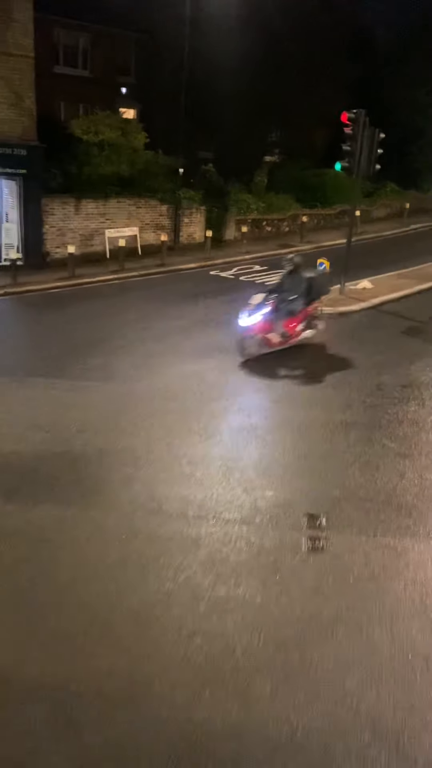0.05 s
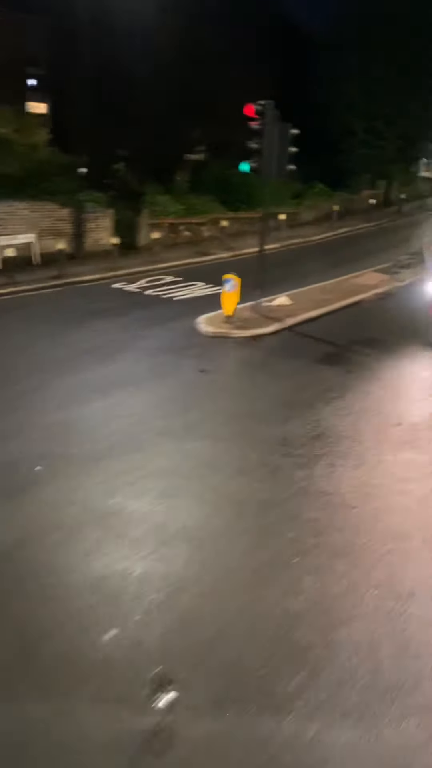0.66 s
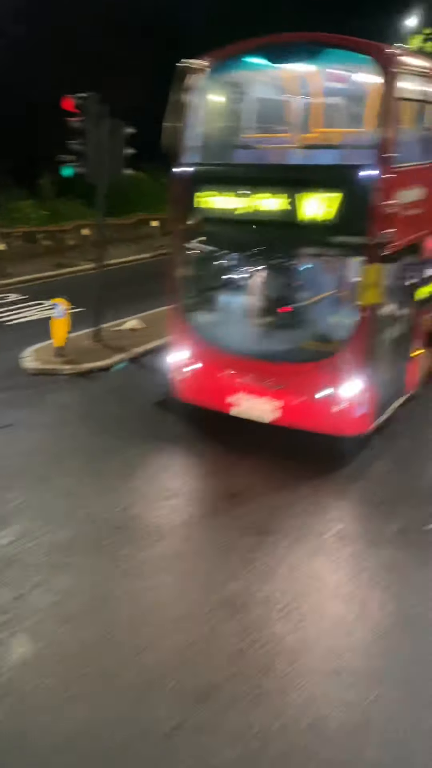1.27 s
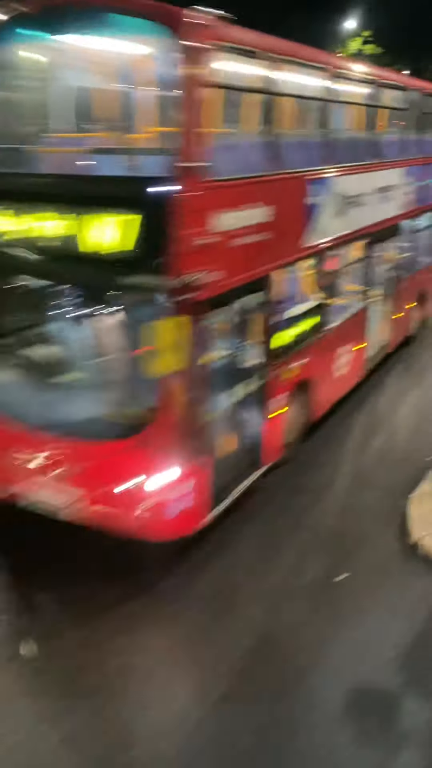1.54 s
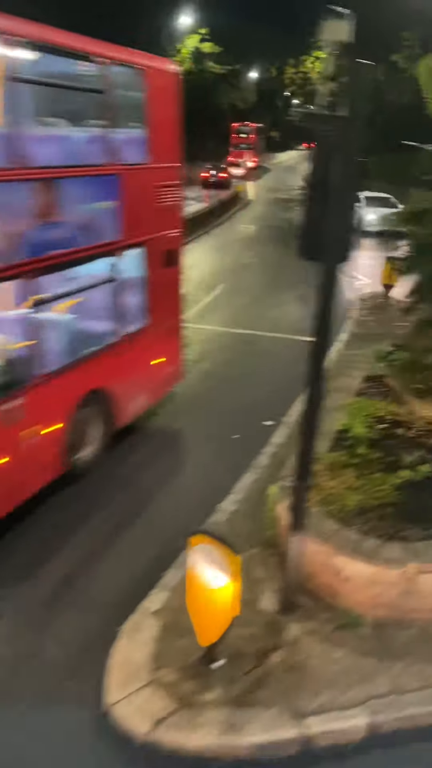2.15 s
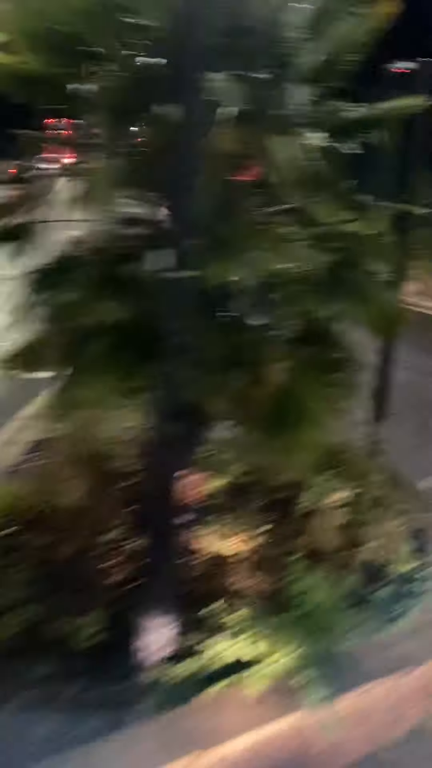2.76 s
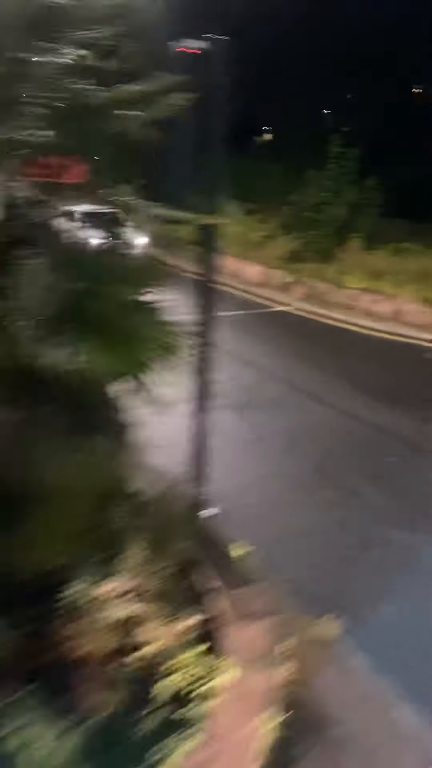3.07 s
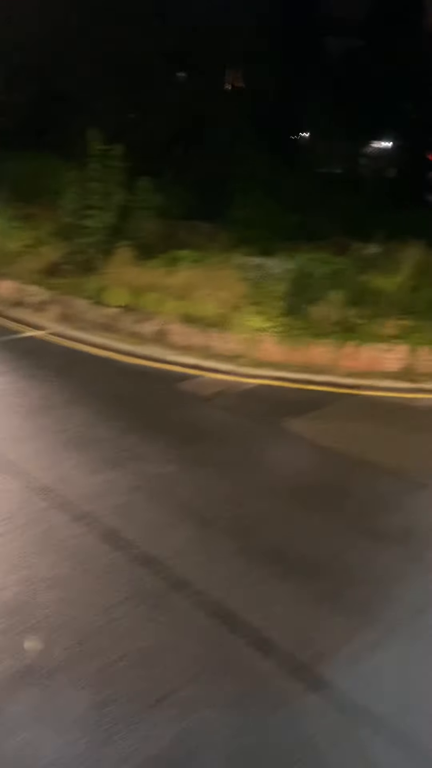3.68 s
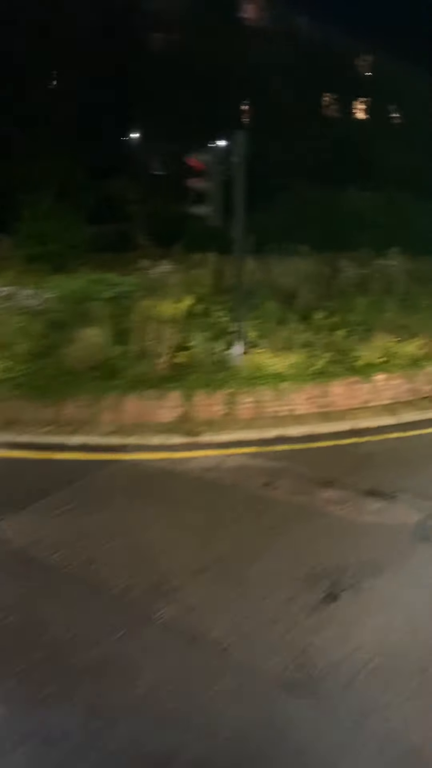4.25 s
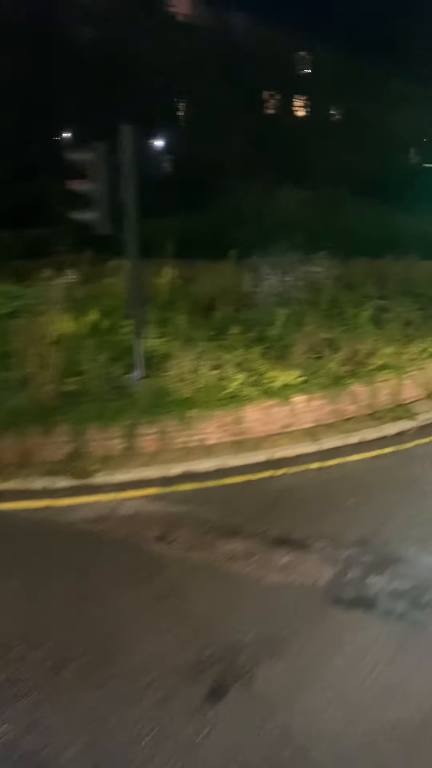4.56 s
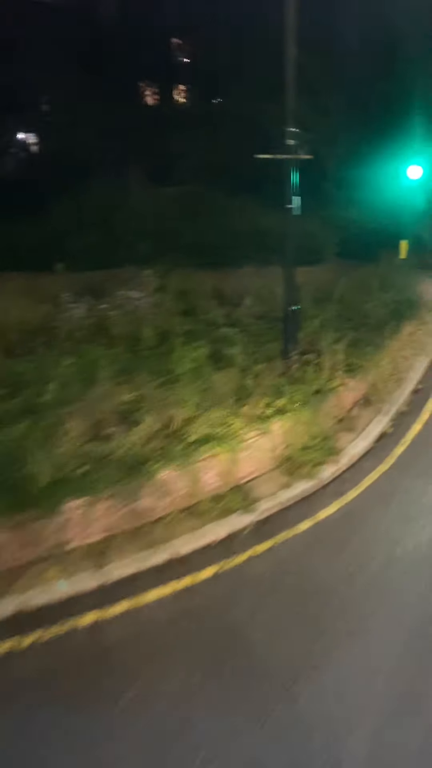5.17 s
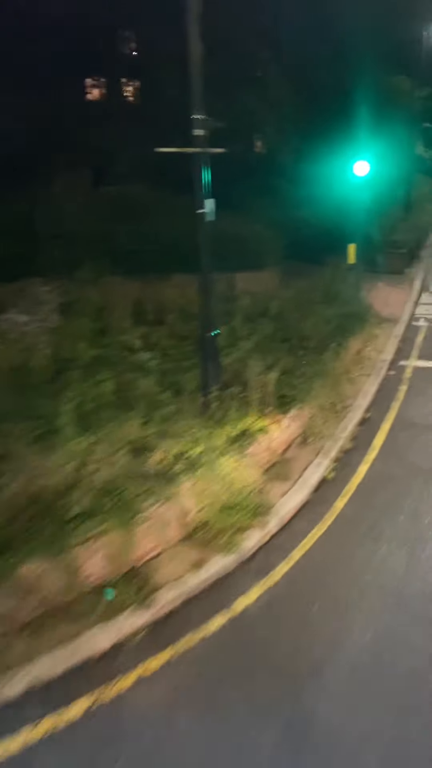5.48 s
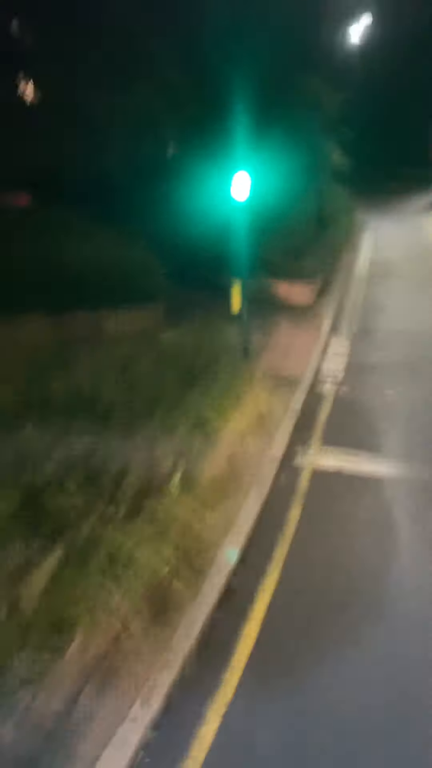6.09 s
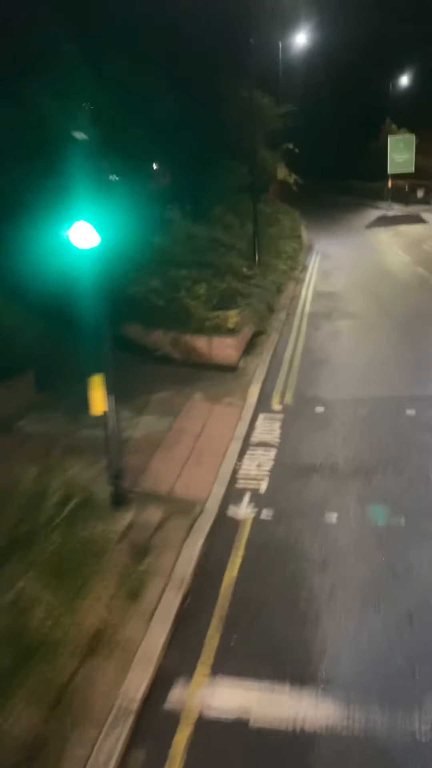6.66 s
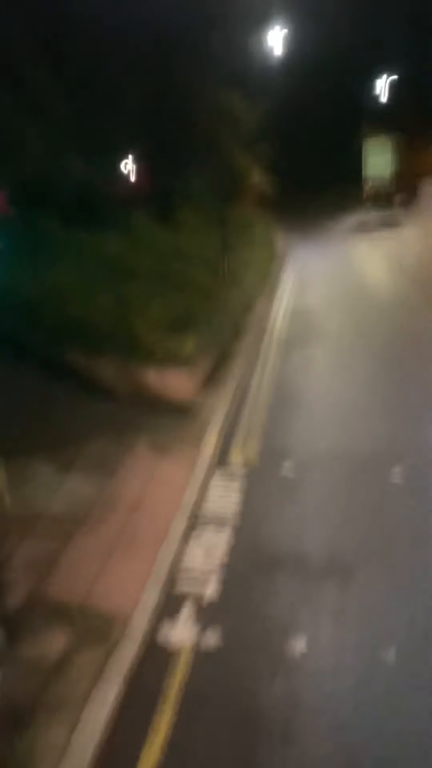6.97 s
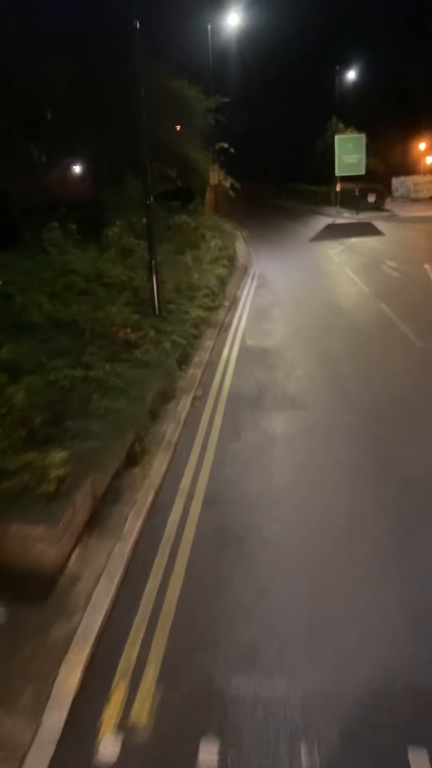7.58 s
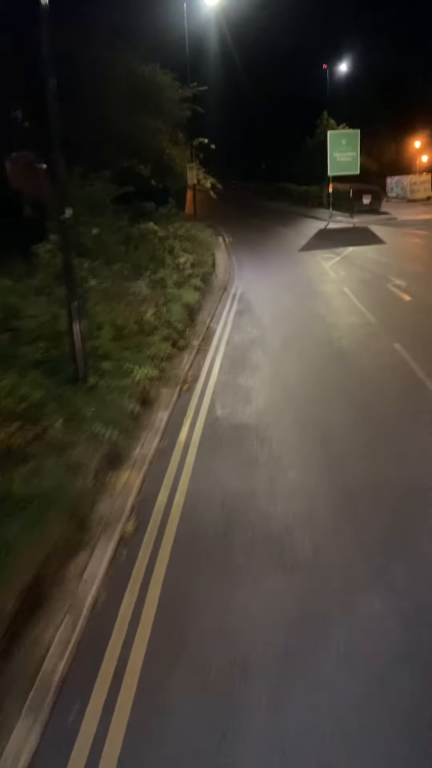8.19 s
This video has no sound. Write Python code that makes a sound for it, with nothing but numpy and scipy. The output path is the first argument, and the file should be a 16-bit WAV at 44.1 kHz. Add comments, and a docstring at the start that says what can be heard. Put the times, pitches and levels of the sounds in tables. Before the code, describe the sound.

Inside a bus, a low diesel engine idles briefly and accelerates, a car swishes past, and loose panels knock and clatter.

```python
"""Night bus, upper deck

Stereo microphone at the front seat of a double-decker. The brakes sing faintly, air valves spit, then
the six-cylinder diesel pulls away over a fading low hum, changes up and pulls again, its orders sweeping
through a boom of the cabin. Outside the glass an oncoming car hisses by on the wet road. Bumps make the
body thump, and its loose panels clack and chatter around the seat."""
import sys
import numpy as np
from scipy import signal
from scipy.fft import rfft, irfft, next_fast_len
from scipy.io import wavfile

SR = 44100
rng = np.random.default_rng(int(sys.argv[2]) if len(sys.argv) > 2 else 0)


def generate_wav(signal):
    """Clip the signal to [-1, 1] and save it as 16-bit WAV at the path in sys.argv[1]."""
    frames = np.transpose(np.atleast_2d(signal))
    scaled = np.clip(frames, -1, 1) * 32767
    pcm = np.round(scaled).astype(np.int16)
    wavfile.write(sys.argv[1], SR, pcm)


N = 367339
TIME = np.arange(N) / SR


# Engine speed, falling at the gear change: t/s, firing rate/Hz
FIRING_RATE = [(0, 40.7), (.45, 33.2), (.75, 32.3), (.97, 32), (1.3, 55.3), (1.55, 63.6), (1.8, 66.3),
               (2.5, 68.3), (3.3, 72.1), (4.8, 80.6), (5.05, 79.2), (5.3, 75.3), (5.8, 63), (6.05, 63.9),
               (6.3, 67.1), (8.33, 81.8)]
# Firing tone from the upper deck: t/s, relative level/dB
FIRING_LEVEL = [(0, -18), (.2, -15.5), (.9, -16), (1.05, -10.5), (1.3, -14), (1.5, -17.5), (2.1, -17.5),
                (2.6, -11.5), (3.2, -11), (5.0, -14), (5.2, -11), (5.55, -11.5), (5.9, -14), (6.6, -14),
                (6.85, -9.5), (7.05, -14), (8.33, -13)]
# Brief dips of that tone: t/s, half length/s, gain/dB
FIRING_DIPS = [(1.13, .04, -22), (1.39, .035, -8), (1.78, .06, -6), (5.71, .05, -9.5), (6.2, .09, -12),
               (7.17, .07, -4)]
# Exhaust and block tones: cycles per crank turn, relative level coasting/dB, pulling/dB
ENGINE_ORDERS = [(1.5, -37, -21.5), (2, -38, -22), (2.5, -35, -15.5), (3, 0, 0), (3.5, -31, -19),
                 (4, -30, -11.5), (4.5, -29, -17.5), (5, -30, -22), (5.5, -30, -20), (6, -15, -16),
                 (6.5, -30, -30), (7, -25, -32), (7.5, -22, -30), (8, -23, -20.5), (8.5, -28, -32),
                 (9, -18, -29), (10, -31, -30), (10.5, -27, -30), (11, -30, -31), (12, -16, -25),
                 (14, -35, -35), (15, -26, -40), (18, -26, -43)]
# Standing waves of the cabin, lifting or hollowing each order under load: f/Hz, gain/dB
CABIN_RESPONSE = [(85, 0), (96, 3), (108, -1), (119, 4), (133, -7), (146, -3), (158, 4), (175, -4),
                  (195, -3), (212, 2), (240, 0)]

def engine(unevenness=.12, other_orders_db=-14, gain_db=3):
    """The diesel fires three times a crank turn; under load unequal cylinders add the orders between."""
    dips_db = sum(db * np.exp(-((TIME - s) / half_s) ** 2) for s, half_s, db in FIRING_DIPS)
    firing_db = in_time(FIRING_LEVEL) + dips_db
    load = throttle()
    turns_hz = in_time(FIRING_RATE) / 3
    crank = phase_of(turns_hz)
    tones = 0
    for order, coasting_db, pulling_db in ENGINE_ORDERS:
        waver = 1 + unevenness * (order != 3) * drift(4)
        cabin_db = np.interp(order * turns_hz, *np.transpose(CABIN_RESPONSE))
        order_db = coasting_db + load * (pulling_db + cabin_db - coasting_db)
        base_db = firing_db if order == 3 else other_orders_db
        tones += from_db(base_db + order_db) * waver * np.cos(order * crank + rng.uniform(0, 2 * np.pi))
    return cabin_boom(crank) + tones * from_db(gain_db + .02 * drift(7.8))


# Engine orders that shake the cabin: cycles per crank turn, relative level/dB
SHAKING_ORDERS = [(10, -6), (11, -12.5), (12, 0), (13, -5)]
# How hard they shake it: t/s, level/dB
SHAKE_LEVEL = [(0, -39), (1.15, -11), (1.4, -10), (1.6, -22.5), (1.85, -19), (2.4, -14), (3.0, -18),
               (3.3, -27.5), (3.7, -15), (4.35, -16.5), (4.85, -9.5), (5.2, -17.5), (5.55, -17),
               (6.3, -28.5), (6.65, -20), (7.05, -26.5), (7.7, -26.5), (8.2, -8.5)]

def cabin_boom(crank, hz=271.1, width_hz=16.9):
    """A narrow resonance of the cabin swells as an engine order crosses it."""
    shake = sum(from_db(db) * np.cos(order * crank) for order, db in SHAKING_ORDERS)
    shake *= from_db(in_time(SHAKE_LEVEL) + 1.2 * drift(28))
    return np.sqrt(2) * resonate_twice(shake, hz, width_hz)


PULL_AWAY_S = .91

def throttle(rise_s=.3):
    """The throttle goes from shut (0) to open (1) and stays open."""
    return np.clip((TIME - PULL_AWAY_S) / rise_s, 0, 1)


# Steady rumble of the body under the seat: t/s, level/dB
BODY_LEVEL = [(0, -24), (.8, -25.5), (1.5, -23), (2.05, -23.5), (2.3, -38.5), (3.3, -28.5), (4.4, -25.5),
              (5.3, -23.5), (6.4, -20.5), (8.33, -21.5)]
# Body rumble, tyre roar and wet spray, from inside: f/Hz, relative density/dB
RUMBLE_SPECTRUM = [(15, -37.5), (30, -6), (50, 12), (85, 6.5), (130, 3.5), (190, 0), (260, -0.5),
                   (330, -5.5), (450, -18), (650, -23.5), (1200, -48.5), (4000, -100)]
ROAR_SPECTRUM = [(200, -4), (400, -1.5), (600, -11), (800, -12), (1020, -12.5), (1400, -13.5), (1850, -14),
                 (2250, -21.5), (2750, -20.5), (3250, -27), (3800, -25), (4600, -32), (5400, -57),
                 (9500, -56), (12500, -76.5)]
SPRAY_SPECTRUM = [(2500, 0), (4500, 4), (5400, 4), (7200, 4), (9500, -1), (10700, -17), (12500, -36.5),
                  (16000, -53.5)]
# Hollow notes of the body over a bump: f/Hz, width/Hz, level against the bump's rumble/dB
BODY_MODES = [(186, 50, -5.5), (385, 43, -16), (540, 55, -25)]

def road(roar_db=-39, spray_db=-61.5, bump_spray_db=-19, crawl_db=-1, crawl_low_hz=82):
    """The body rumbles on its springs, deeper once under way; the tyres below roar and throw spray."""
    bump_rumble, bump_roar, _ = bumps()
    rolling_db = crawl_db * (1 - throttle())
    rumble_gain = np.hypot(from_db(in_time(BODY_LEVEL)), bump_rumble)
    roar_gain = np.hypot(from_db(roar_db + rolling_db), bump_roar)
    spray_gain = np.hypot(from_db(spray_db + rolling_db), from_db(bump_spray_db) * bump_roar)
    deep = noise(RUMBLE_SPECTRUM, flutter_db=1.37, rate=22.4)
    shallow = signal.sosfilt(signal.butter(3, crawl_low_hz, "high", fs=SR, output="sos"), deep)
    rumble = shallow + throttle() * (deep - shallow)
    hollow = sum(from_db(db) * rms_one(resonate_twice(rng.standard_normal(N), hz, width_hz))
                 for hz, width_hz, db in BODY_MODES)
    roar = through_panels(noise(ROAR_SPECTRUM, flutter_db=1.32, rate=24), modes_db=-4.5)
    spray = noise(SPRAY_SPECTRUM, flutter_db=2, rate=28)
    return rumble_gain * rumble + bump_rumble * hollow + roar_gain * roar + spray_gain * spray


# Bumps in the road: t/s, length/s, body rumble/dB, tyre roar/dB, chatter/dB
ROAD_BUMPS = [(0.949, 0.14, -23, -43, -44), (2.075, 0.065, -28, -34, -33.5), (2.47, 0.043, -43.5, -48, -36),
              (3.879, 0.13, -20.5, -37, -29.5), (5.926, 0.358, -16, -29.5, -35),
              (6.852, 0.35, -20.5, -28, -32.5), (7.191, 0.18, -25.5, -37.5, -44)]

def bumps(attack_s=.033, release_s=.029):
    """Each bump shakes the bus for its length: gains of rumble, roar and chatter."""
    gains = 0
    for s, length_s, *levels_db in ROAD_BUMPS:
        attack = np.clip((TIME - s) / attack_s, 0, 1)
        release = np.exp(-np.clip((TIME - s - length_s) / release_s, 0, 20))
        gains += np.outer(from_db(levels_db), attack * release)
    return gains


# Loose panels knocking in the cabin: t/s, relative level/dB, snap against the knock/dB
PANEL_KNOCKS = [(2.094, -29, -15), (3.927, -22.5, -25), (3.962, -21.5, -27), (3.97, -6, -7),
                (3.986, -20.5, -22), (4.115, -16, -6), (4.184, -19, -7), (4.247, -18.5, -8),
                (4.377, -25, -22), (4.61, -28, -31), (4.733, -20.5, -13), (4.954, -27.5, -24),
                (4.995, -28.5, -27), (5.038, -26.5, -26), (5.116, -29, -24), (5.397, -36.5, -15),
                (5.637, -24.5, -26), (5.687, -14.5, -30), (5.779, -16, -25), (5.794, -16, -13),
                (5.921, -15.5, -9), (5.935, -11.5, -29), (6.018, -11, -25), (6.143, -4, -13),
                (6.212, -21, -25), (6.238, -4, -22), (6.355, -11, -14), (6.389, -22.5, -9),
                (6.475, -13.5, -11), (6.56, -10, -12), (6.563, -13, -11), (6.653, -12, -9),
                (6.765, -17.5, -10), (6.845, -22.5, -8), (6.891, -8.5, -12), (6.902, -14, -19),
                (7.023, -9.5, -17), (7.044, -8.5, -24), (7.137, -11.5, -20), (7.15, -10.5, -6),
                (7.16, -15, -20), (7.243, -13, -16), (7.259, -14.5, -14), (7.278, -21.5, -7),
                (7.352, -17.5, -8), (7.365, -9, -8.5), (7.435, -22.5, -10), (7.46, -21.5, -18),
                (7.47, -22, -6), (7.54, -24, -12), (7.72, -13.5, -14), (7.784, -27, -11), (7.85, -18.5, -9),
                (7.919, -23.5, -31), (8.022, -20, -14), (8.121, -14.5, -13), (8.227, -19.5, -22)]
# The panel's slap, and the contact heard directly: f/Hz, relative density/dB
SLAP_SPECTRUM = [(120, -3.5), (330, 4), (520, -2.5), (720, 3.5), (950, 3.5), (1400, -9.5), (1750, -1),
                 (2050, -2), (2300, -8), (2700, -4.5), (3200, -16.5), (3900, -13), (4900, -26),
                 (6100, -22.5), (8500, -24), (10500, -35.5), (15000, -71.5)]
CONTACT_SPECTRUM = [(300, -16), (900, 8.5), (2600, 4), (4000, -6.5), (5000, -23), (8500, -17),
                    (11000, -37.5), (15000, -38)]

def knocks(crack_s=.0024, echoes_s=.015, cabin_s=.11, contact_s=.0008, snap_s=.0018, gain_db=-7):
    """A panel slaps its frame: sharp contact, bright snap, early echoes, ring and the cabin's tail."""
    t = TIME[:SR // 4]
    fade = np.exp(-t / crack_s) + from_db(2) * np.exp(-t / echoes_s) + from_db(-9) * np.exp(-t / cabin_s)
    onset = 1 - np.exp(-t / .00017)
    treble = signal.butter(3, [5000, 11000], "band", fs=SR, output="sos")
    out = np.zeros((2, N + len(t)))
    for s, db, snap_db in PANEL_KNOCKS:
        slap = rms_one(stereo_noise(fade, SLAP_SPECTRUM))
        contact = rms_one(stereo_noise(np.exp(-t / contact_s), CONTACT_SPECTRUM))
        hit = (slap + from_db(-1) * panel_ring(t)) * onset + from_db(-7) * contact
        hit /= hit[:, :SR // 200].std()   # unit power over the first 5 ms
        snap = from_db(snap_db) * signal.sosfilt(treble, rng.standard_normal(len(t)) * np.exp(-t / snap_s))
        at = round(s * SR)
        out[:, at:at + len(t)] += from_db(db + gain_db) * (hit + snap)
    return out[:, :N]


# Modes of the body panels: f/Hz, relative level/dB
PANEL_MODES = [(511, 2), (610, 0), (765, -2.5), (910, 2), (1000, 2.5), (1140, -13.5), (1450, -7.5),
               (1730, 0), (1830, 3.5), (1930, 1.5), (2055, 4.5), (2270, -6), (2560, -4.5), (2700, -8.5),
               (3250, -9.5), (3820, -13)]

def panel_ring(t, rise_s=.004, t60_s=.1, pitch_spread=.015):
    """The ring builds as a blow spreads; the panel sits differently each time, shifting its modes."""
    ring = 0
    for hz, db in PANEL_MODES:
        shifted_hz = hz * (1 + pitch_spread * rng.normal())
        phase = 2 * np.pi * shifted_hz * t + rng.normal(0, .5, (2, 1))   # differs at each microphone port
        ring += from_db(db + rng.normal(0, 2.5)) * rng.choice([-1, 1]) * np.sin(phase)
    return rms_one(ring * (1 - np.exp(-t / rise_s)) * from_db(-60 * t / t60_s))


def through_panels(x, modes_db, width_hz=75):
    """Sound passing through the panels picks up their modes, broadened because the panels differ."""
    return x + sum(from_db(db + modes_db) * resonate(x, hz, width_hz) for hz, db in PANEL_MODES)


# Heavy thumps, reaching the seat through the body: t/s, level/dB, contact time/s
BODY_THUMPS = [(3.903, -5, .0055), (3.9695, -13, .0008), (6.0072, -3, .0017), (6.0942, -2, .0016),
               (6.12, -15, .004), (6.197, -7, .005), (6.241, -11, .003), (6.861, -8, .0018),
               (6.91, -13, .002), (6.983, -15, .003), (7.024, -15, .0015), (7.16, -12, .003),
               (7.17, -12, .0025)]

def thumps(sweep_cycles=1.45, low_hz=28, fade_s=.0105):
    """Bending waves in a large panel: highs arrive first, so each thump drops to a deep note and stops."""
    t = TIME[1:SR // 5]
    phase = 2 * np.pi * (sweep_cycles * np.log(t) + low_hz * t)
    wave = np.sin(phase) * np.exp(-(t / fade_s) ** 4)
    out = np.zeros(N)
    for s, db, contact_s in BODY_THUMPS:
        onset = 1 - np.exp(-(t / contact_s) ** 4)   # a soft contact leaves out the first highs
        at = round(s * SR)
        out[at:at + len(t)] += from_db(db) * wave * onset
    return out


def chatter(per_s=260, decay_s=.009, crawl_db=-51.5, fast_db=-46):
    """Small contacts of trim and rails ring the panels, more as the bus gathers speed and over bumps."""
    clicks = (rng.random(N) < per_s / SR) * from_db(rng.uniform(-6, 6, N))
    power = signal.lfilter([1], [1, -np.exp(-2 / (decay_s * SR))], clicks ** 2 + 1e-12)
    ticks = stereo_noise(np.sqrt(power), SLAP_SPECTRUM)
    light = from_db(np.interp(TIME, [PULL_AWAY_S, TIME[-1]], [crawl_db, fast_db]))
    _, _, jolted = bumps()
    return np.hypot(light, jolted) * rms_one(through_panels(ticks, modes_db=2.5))


# A car's tyres on the wet road, one lane over: f/Hz, relative density/dB
CAR_SPECTRUM = [(200, -4), (400, 4), (620, -7), (1000, -3), (1450, -4), (1850, -6), (2250, -9),
                (2900, -14.5), (3800, -17), (4500, -20.5), (5800, -45)]

def oncoming_car(nearest_s=2.95, approach_s=.39, trail_s=.73, roar_db=-33, spray_db=-50.5):
    """A car swishes by beyond the glass, brightest when nearest, and fades more slowly than it came."""
    since = TIME - nearest_s
    nearness = 1 / np.hypot(1, since / np.where(since < 0, approach_s, trail_s))
    tyres = noise(CAR_SPECTRUM, flutter_db=.4, rate=30)
    window_band = from_db(-2) * resonate(tyres, hz=1870, width_hz=130)   # passes the glass most easily
    roar = from_db(roar_db) * rms_one(tyres + window_band)
    spray = from_db(spray_db) * noise(SPRAY_SPECTRUM, flutter_db=1, rate=21)
    return nearness * roar + nearness ** 1.27 * spray   # spray falls off faster with distance


def hum(start_hz=70, end_hz=83, glide_s=.35, level_db=-23):
    """A low hum beside the idling engine creeps up in pitch and fades as the bus pulls away."""
    hz = end_hz + (start_hz - end_hz) * np.exp(-TIME / glide_s)
    level = from_db(level_db + 2 * drift(8.9)) * (1 - throttle())
    return level * np.sqrt(2) * np.sin(phase_of(hz))


# Grabs of a brake pad, a deck below: middle t/s, length/s, level/dB
BRAKE_GRABS = [(0.023, 0.03, -43.5), (0.113, 0.042, -47), (0.148, 0.048, -45), (.325, 0.025, -53),
               (.362, 0.03, -56), (.452, 0.027, -62), (.535, 0.017, -51)]

def brakes(start_hz=4620, end_hz=4800, glide_s=.3, drag_db=-64):
    """A pad sticks and slips on its disc at one high mode, which creeps up as the wheel slows."""
    hz = end_hz + (start_hz - end_hz) * np.exp(-TIME / glide_s)
    grabs = sum(from_db(db) * np.exp(-np.minimum((2 * (TIME - s) / length_s) ** 2, 20))
                for s, length_s, db in BRAKE_GRABS)
    drag = from_db(drag_db) * (1 - throttle())
    flicker = from_db(3 * drift(27))
    return (grabs + drag) * flicker * np.sin(phase_of(hz + 10 * drift(70)))


# Spits of compressed air, faint from upstairs: t/s, level/dB, decay/s
AIR_PUFFS = [(.075, -44, 0.01), (1.635, -50, 0.03), (1.695, -37, 0.0063), (2.092, -51, 0.17),
             (5.255, -41.5, 0.026)]
# Their hiss: f/Hz, relative density/dB
AIR_SPECTRUM = [(2000, -17), (4500, 4), (6000, -1.5), (8000, -3), (10500, -10.5), (15000, -27)]

def air_valves(open_s=.0055):
    """A valve opens and its hiss dies away as the pressure drops."""
    flow = 0
    for s, db, decay_s in AIR_PUFFS:
        t = np.maximum(TIME - s, 0)
        flow += from_db(db) * (1 - np.exp(-t / open_s)) * np.exp(-np.minimum(t / decay_s, 20))
    return flow * noise(AIR_SPECTRUM, flutter_db=-1, rate=82)


# How alike cabin noise is at the microphone's two ports: f/Hz, correlation
PORT_LIKENESS = [(60, 0.99), (200, 1), (380, 0.54), (560, 0.38), (1050, 0.67), (2000, 1), (4000, 0.16),
                 (9000, 1)]

def stereo_noise(envelope, spectrum):
    """Partly alike left and right noise, coloured at minimum phase so that nothing sounds early."""
    length = len(envelope)
    size = 2 * next_fast_len(length // 2 + 2048)
    cepstrum = irfft(np.log(from_db(at_hz(spectrum, size))))
    cepstrum[1:size // 2] *= 2
    cepstrum[size // 2 + 1:] = 0
    white = envelope * rng.standard_normal((2, length))
    mid, side = rfft(white, size) * np.exp(rfft(cepstrum))
    alike = np.clip(at_hz(PORT_LIKENESS, size), 0, 1)
    side *= np.sqrt((1 - alike) / (1 + alike))
    return irfft([mid + side, mid - side])[:, :length]


def noise(spectrum, flutter_db, rate):
    """Continuous stereo noise whose level flutters."""
    return rms_one(stereo_noise(np.ones(N), spectrum)) * from_db(flutter_db * drift(rate))


def drift(rate):
    """Random wander with a spread of one, mostly slower than rate in Hz."""
    step = 40   # samples between points
    r = np.exp(-2 * np.pi * rate * step / SR)
    slow = signal.lfilter([1], [1, -2 * r, r * r], rng.standard_normal(N // step + 2002))[2000:]
    return np.interp(np.arange(N) / step, np.arange(len(slow)), rms_one(slow))


def resonate(x, hz, width_hz):
    """A resonance with a gain of one at its peak."""
    r = np.exp(-np.pi * width_hz / SR)
    feedback = [1, -2 * r * np.cos(2 * np.pi * hz / SR), r * r]
    return signal.lfilter(np.array([1, 0, -1]) * (1 - r * r) / 2, feedback, x)


def resonate_twice(x, hz, width_hz):
    """A resonance with steeper flanks."""
    return resonate(resonate(x, hz, width_hz), hz, width_hz)


def phase_of(hz):
    """Running phase in radians."""
    return 2 * np.pi * np.cumsum(hz) / SR


def from_db(db):
    """Decibels to gain."""
    return 10 ** (np.asarray(db) / 20)


def rms_one(x):
    """Scale to unit power."""
    return x / np.sqrt(np.mean(x ** 2) + 1e-20)


def in_time(points):
    """A time table at every sample."""
    return np.interp(TIME, *np.transpose(points))


def at_hz(points, size):
    """A frequency table on the bins of an FFT."""
    hz, value = np.transpose(points)
    return np.interp(np.log(np.arange(size // 2 + 1) * SR / size + 1), np.log(hz), value)


def scene():
    """Everything as it reaches the front seat."""
    return (engine() + hum() + road() + oncoming_car()
            + knocks() + chatter() + thumps() + brakes() + air_valves())


# Balance of the microphone's ports: f/Hz, left minus right/dB
PORT_BALANCE = [(60, -0.97), (110, -2.5), (170, -3.5), (270, -6), (400, -12), (620, -9.5), (1000, 0),
                (2200, -1), (8000, -.5)]
# Phase between them: f/Hz, lead of the left/rad
PORT_LEAD = [(330, 0), (520, 2.5), (720, 2), (950, 0.95), (1250, 1.23), (1600, -1), (2000, 0.5), (2600, 2),
             (4000, 1.64), (8000, 2.0)]

def record(dry, cutoff_hz=15800):
    """The microphone's two ports differ in level and phase; peaks are rounded and the top is cut."""
    size = 2 * next_fast_len(N // 2 + 2048)
    log_ratio = np.log(from_db(at_hz(PORT_BALANCE, size))) + 1j * at_hz(PORT_LEAD, size)
    ports = np.exp([log_ratio / 2, -log_ratio / 2])
    heard = irfft(rfft(dry, size) * ports / np.abs(ports.mean(axis=0)))[:, :N]
    rounded = heard / (1 + heard ** 8) ** (1 / 8)
    return signal.sosfilt(signal.cheby2(12, 70, cutoff_hz, fs=SR, output="sos"), rounded)


dry = scene()
out = record(dry)
generate_wav(out)
```